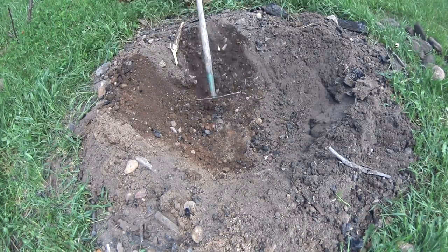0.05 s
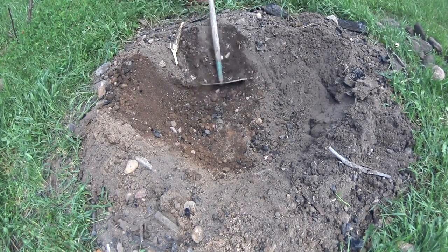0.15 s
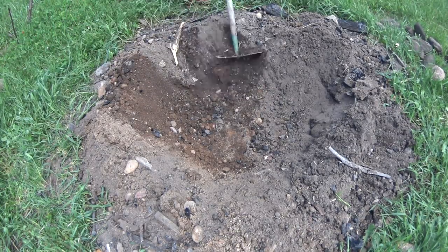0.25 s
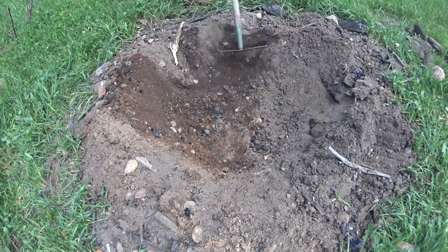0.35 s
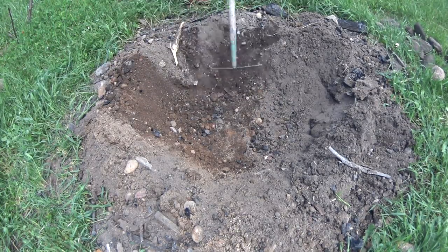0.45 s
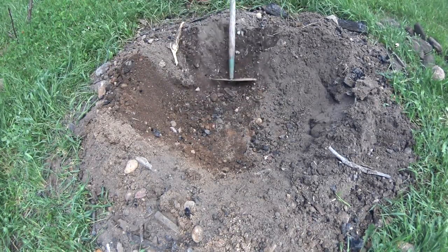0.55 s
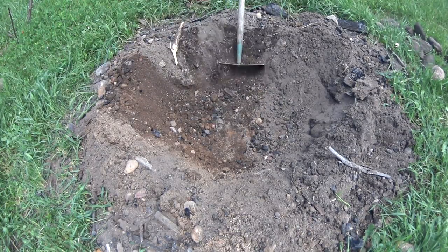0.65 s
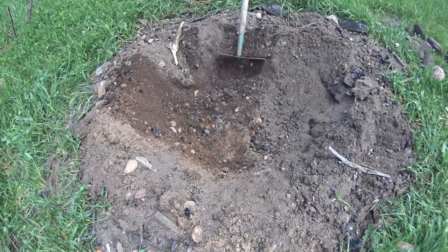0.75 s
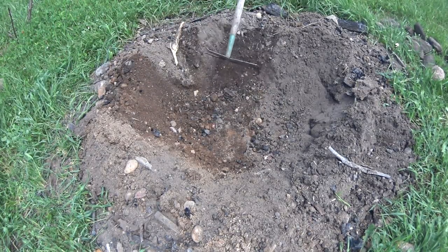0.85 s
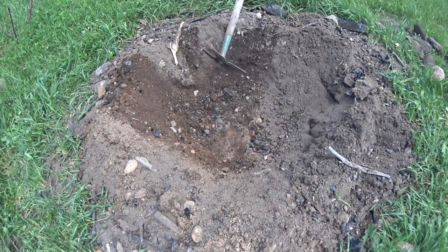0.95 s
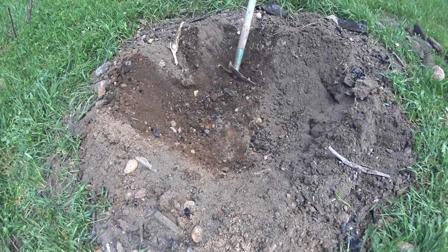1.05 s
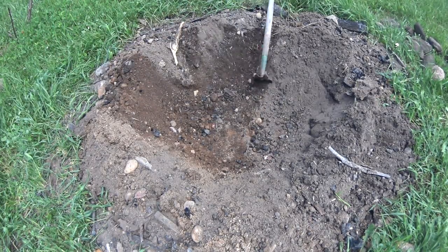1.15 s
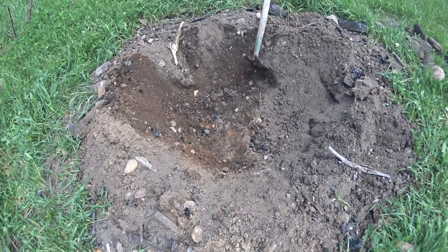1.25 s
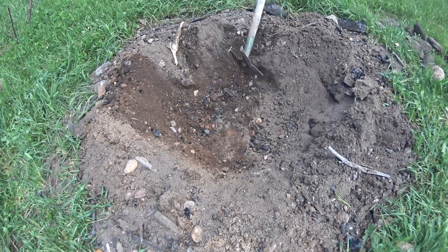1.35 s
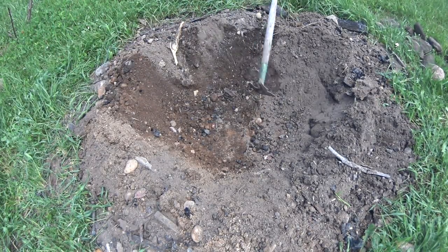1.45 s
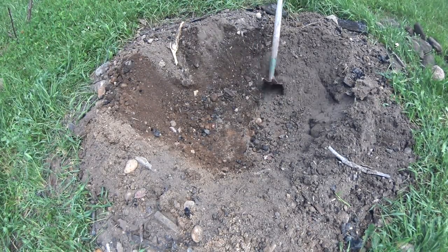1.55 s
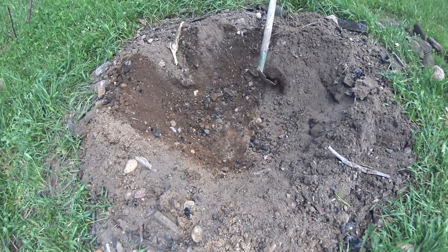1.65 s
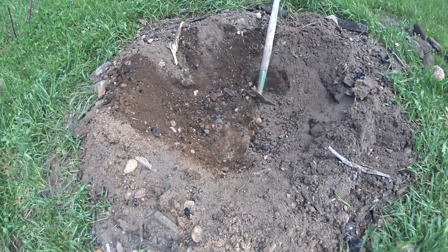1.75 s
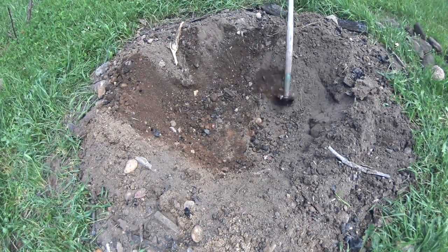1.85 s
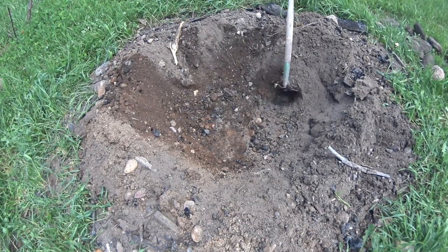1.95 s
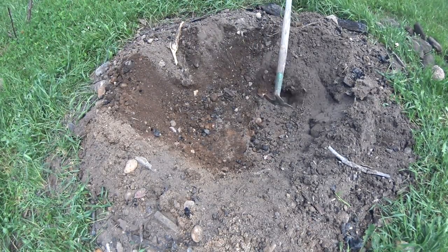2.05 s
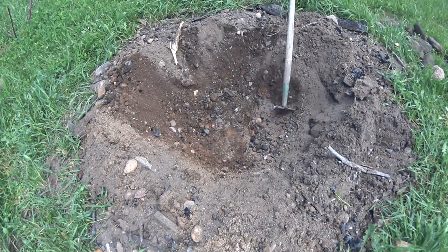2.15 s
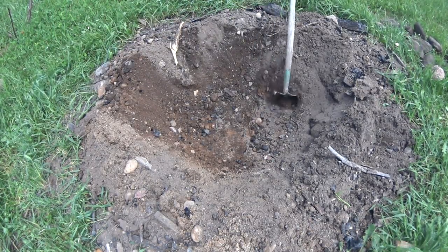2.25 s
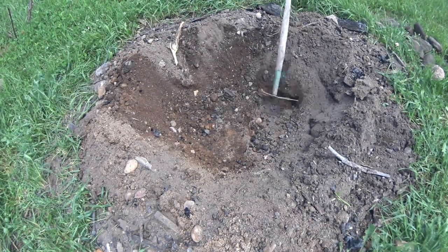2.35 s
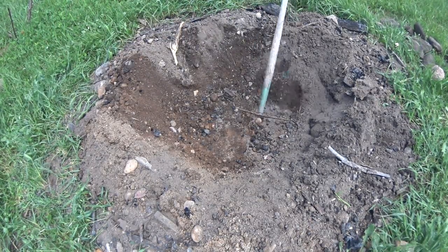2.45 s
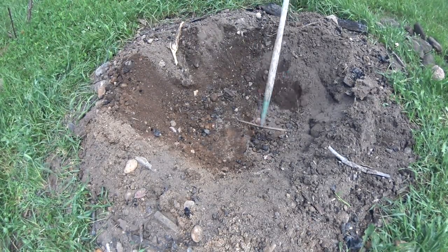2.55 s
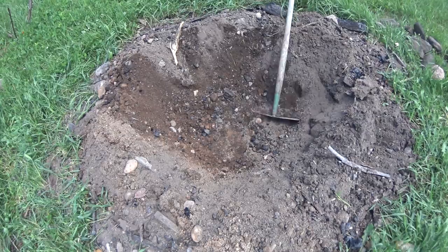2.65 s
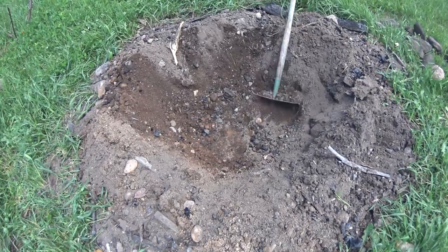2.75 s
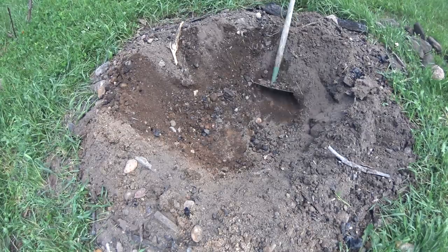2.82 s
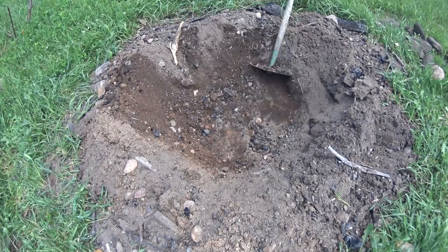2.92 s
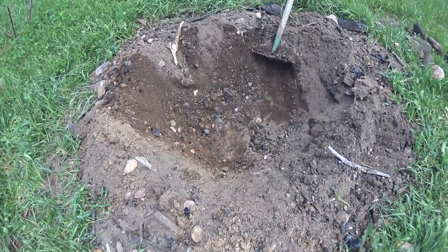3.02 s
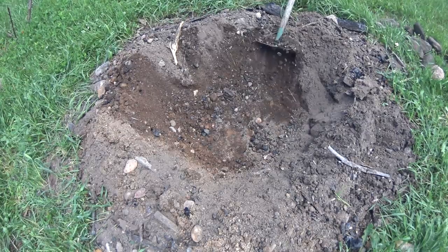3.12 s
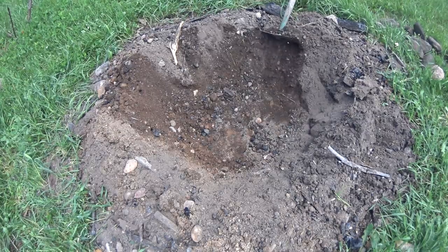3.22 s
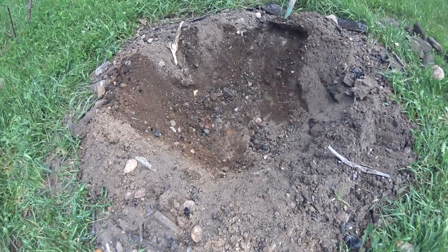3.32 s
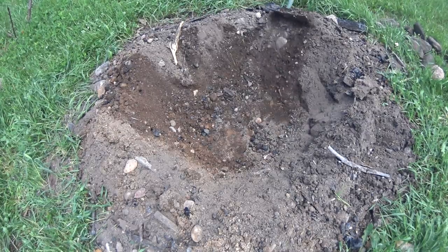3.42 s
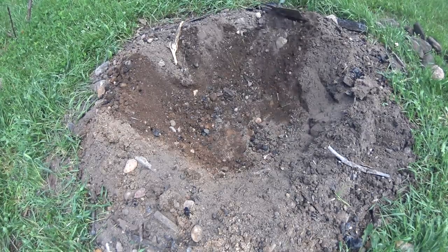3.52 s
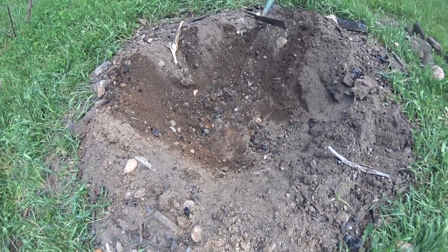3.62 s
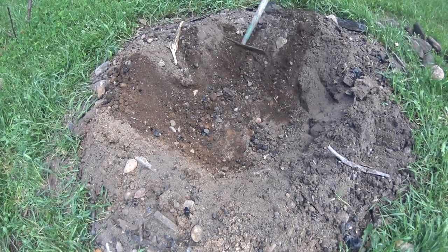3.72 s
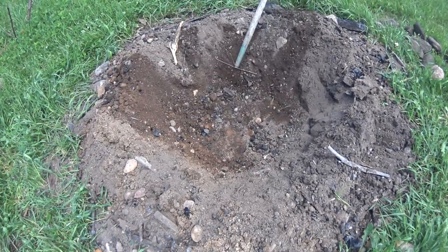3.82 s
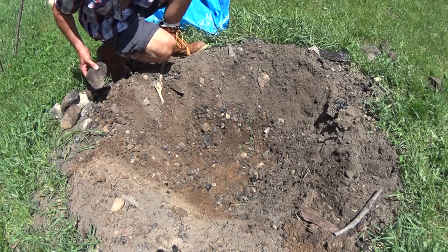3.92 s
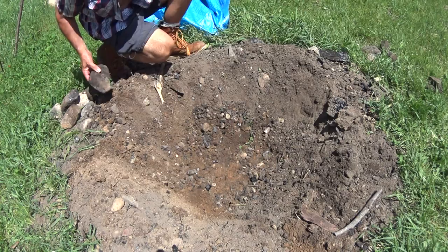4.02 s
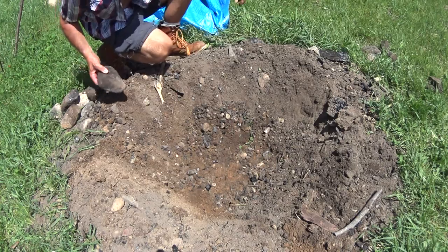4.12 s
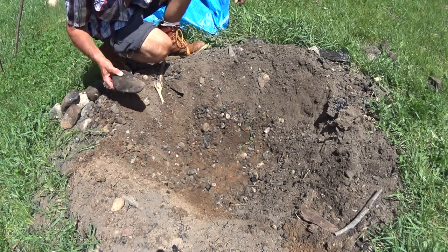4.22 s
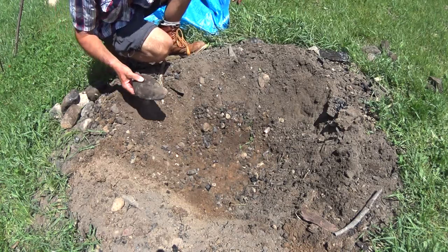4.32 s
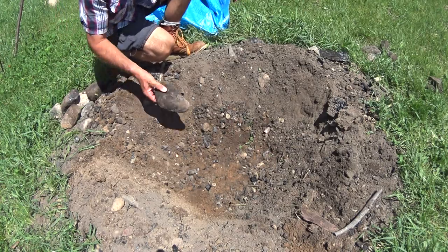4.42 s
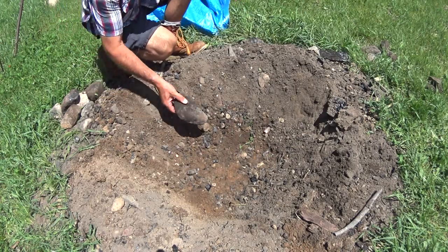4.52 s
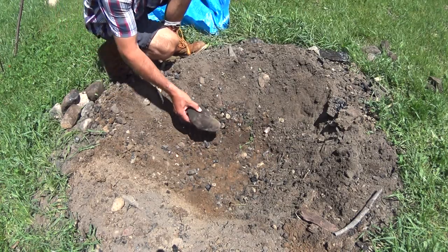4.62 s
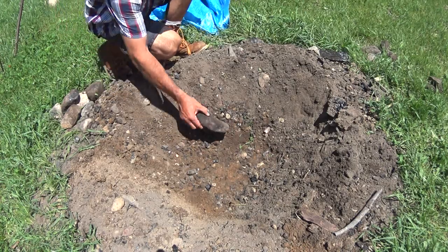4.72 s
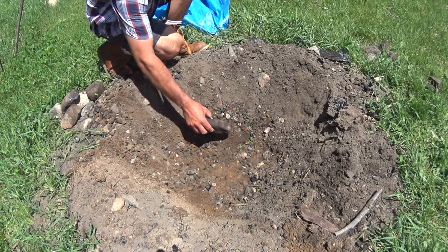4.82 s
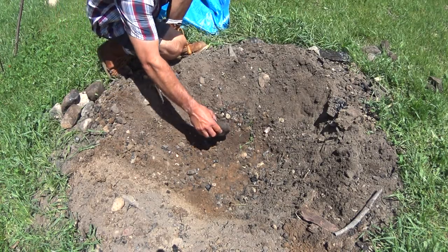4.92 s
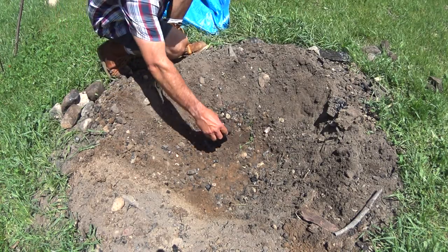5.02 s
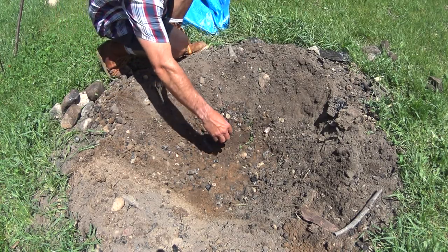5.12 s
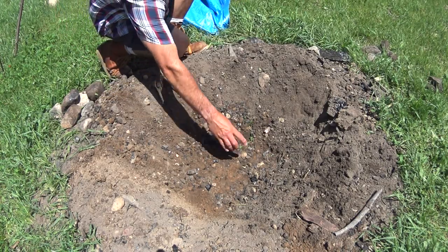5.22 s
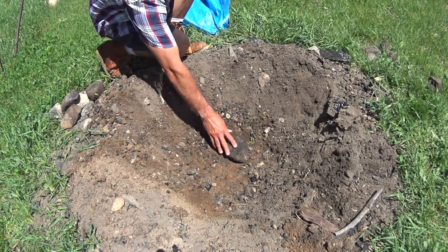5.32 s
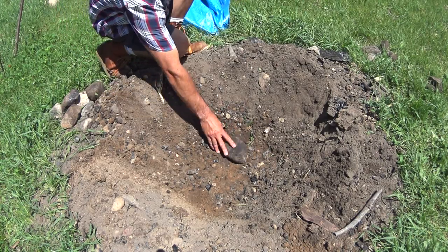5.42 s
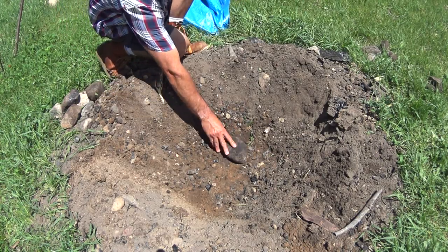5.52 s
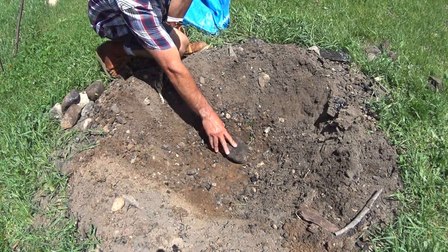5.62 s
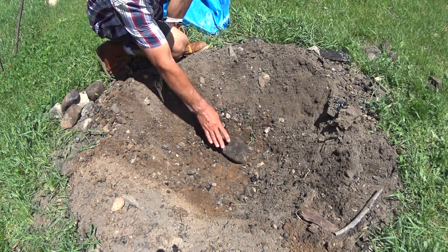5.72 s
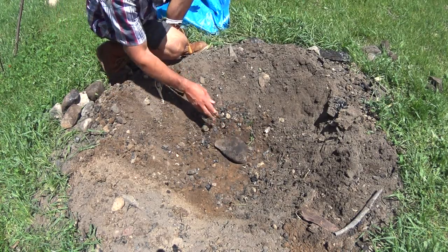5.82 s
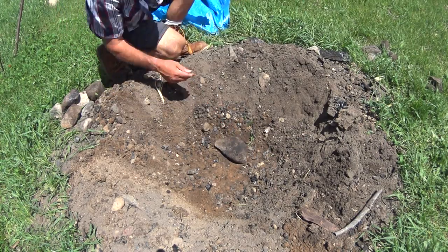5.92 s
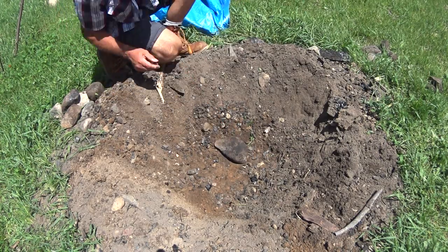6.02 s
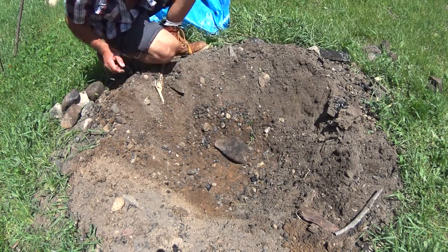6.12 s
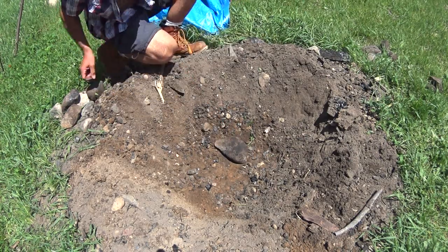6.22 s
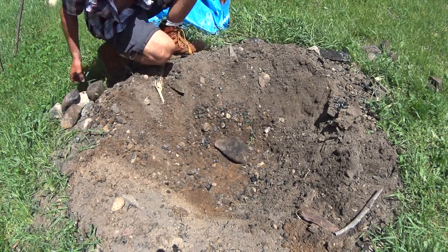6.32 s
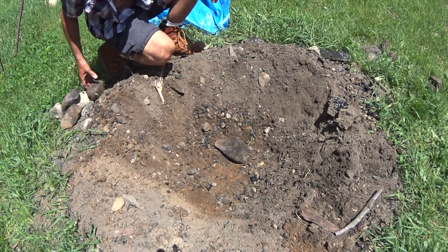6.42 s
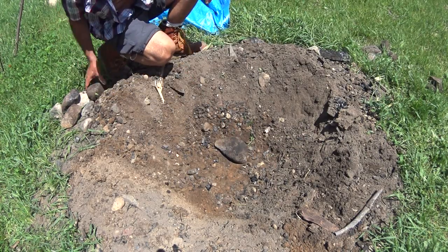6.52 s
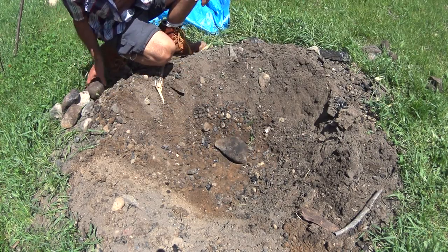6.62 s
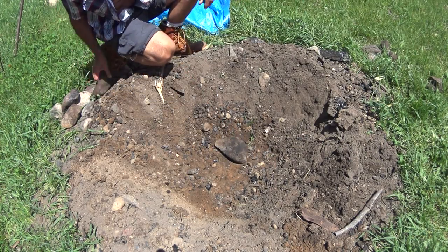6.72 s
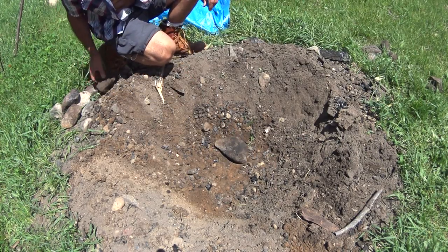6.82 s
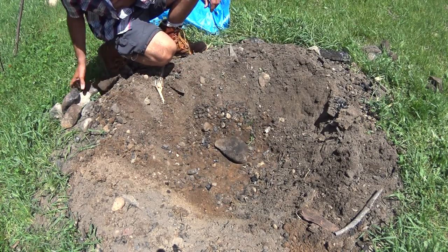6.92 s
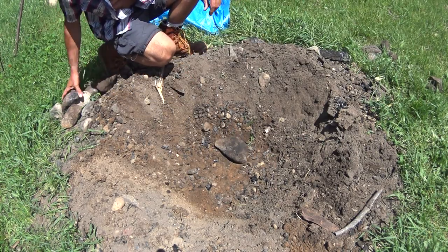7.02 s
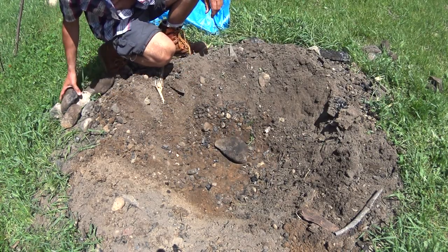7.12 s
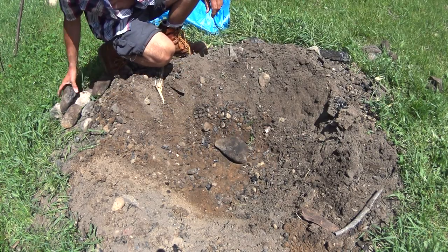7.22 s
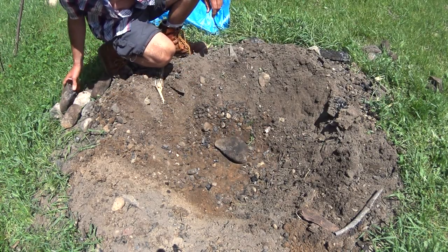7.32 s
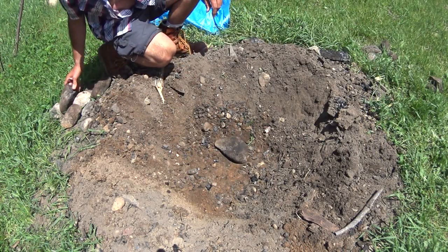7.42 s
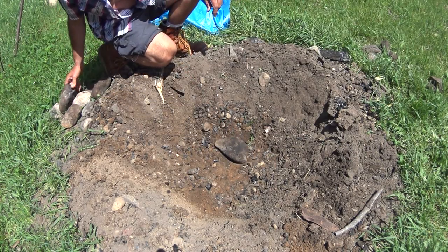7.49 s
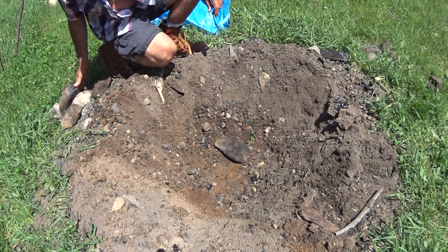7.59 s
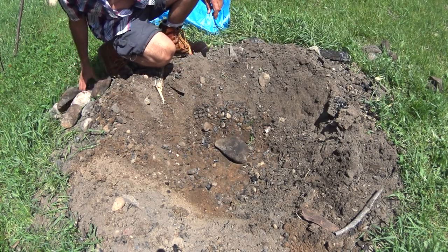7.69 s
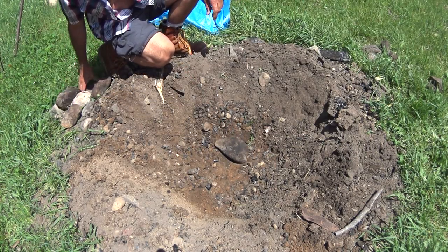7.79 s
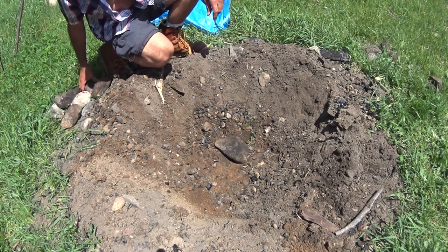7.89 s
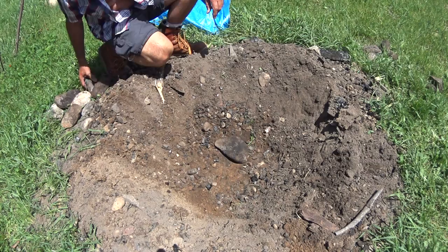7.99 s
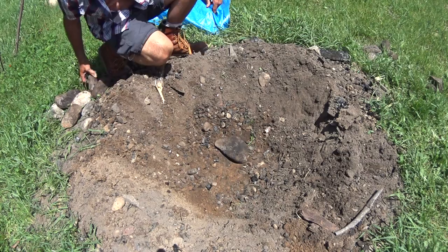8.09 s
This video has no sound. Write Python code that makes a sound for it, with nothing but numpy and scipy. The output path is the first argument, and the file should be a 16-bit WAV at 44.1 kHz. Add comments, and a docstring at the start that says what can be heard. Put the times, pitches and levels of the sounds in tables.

```python
"""A steel rake chops into stony soil in a meadow; the blows crunch, ring the head and thump up through the camera stand,
which creaks. After a cut, with a click, to a quieter moment a hand lays a stone down and picks among others; birds call.
Random grit drives steel modes or filtered ticks; the stand is decaying sines, rumble and joint ticks;
birds are gliding sines and rough trills with echoes; falling grains and banded noise lie under all."""
import sys
import numpy as np
from scipy import signal
from scipy.io import wavfile

SR = 44100
rng = np.random.default_rng(int(sys.argv[2]) if len(sys.argv) > 2 else 0)


def output_pcm(signal):
    """Save a mono or channel-first signal as 16-bit PCM at the path in sys.argv[1].

    Samples are clipped to [-1, 1] before scaling.
    """
    pcm = np.clip(np.atleast_2d(signal).T, -1, 1) * 32767
    wavfile.write(sys.argv[1], SR, np.round(pcm).astype(np.int16))


N = 359415
CUT_S = 3.93   # the quieter moment starts
OPPOSITE = np.array([[1], [-1]])   # left and right in opposite phase


def from_db(db):
    """Gain of a level."""
    return 10 ** (np.asarray(db) / 20)


def rms_one(x):
    """Scaled to rms 1."""
    return x / np.sqrt(np.mean(x ** 2) + 1e-20)


def peak_one(x):
    """Scaled to peak 1."""
    return x / np.abs(x).max()


def at_hz(points, hz):
    """A spectrum read on a log frequency axis."""
    points = np.array(points)
    return np.interp(np.log(hz), np.log(points[:, 0]), points[:, 1])


def band(x, low_hz, high_hz):
    """Butterworth band-pass."""
    edges_hz = [low_hz, min(high_hz, .45 * SR)]
    return signal.sosfilt(signal.butter(2, edges_hz, "band", fs=SR, output="sos"), x)


def resonance(x, hz, width_hz):
    """Two-pole resonance, gain 1 on top."""
    r = np.exp(-np.pi * width_hz / SR)
    zeros = np.array([1, 0, -1]) * (1 - r * r) / 2
    poles = [1, -2 * r * np.cos(2 * np.pi * hz / SR), r * r]
    return signal.lfilter(zeros, poles, x)


def ring(modes, t, spread_db):
    """Decaying sines, each struck with a random strength."""
    total = 0
    for hz, db, t60_s in modes:
        level_db = db - 60 * t / t60_s + spread_db * rng.standard_normal()
        total = total + from_db(level_db) * np.sin(2 * np.pi * hz * t)
    return total


def grit(count, per_s, spread_db):
    """Random contacts of either sign; a spread above 0 dB makes their sizes uneven."""
    sizes = from_db(spread_db * np.minimum(rng.exponential(1, count), 5)) * rng.choice([-1, 1], count)
    return sizes * (rng.random(count) < per_s / SR)


def drift(count, rate_hz):
    """Low-passed noise of rms 1."""
    low_pass = signal.butter(2, rate_hz, fs=SR, output="sos")
    return rms_one(signal.sosfilt(low_pass, rng.standard_normal(count)))


def add(out, s, sound, pan_db):
    """Mixes a sound in at s seconds; pan_db is left over right."""
    i = round(s * SR)
    sound = sound[..., :N - i]
    out[:, i:i + sound.shape[-1]] += sound * from_db([[pan_db / 2], [-pan_db / 2]])


def rake_and_click():
    """Dense grit drives a broad crack and the damped head modes, scattered stones widen it; the cut's click likewise."""
    # rake on gravel, but the last row is the click at the cut: t/s, peak/dB, brightest f/Hz, crunch length/s
    blows_and_click = [(0.1506, -24.5, 2980, 0.025), (0.1609, -6, 4630, 0.013), (0.179, -22, 5800, 0.024),
                       (0.2126, -21, 3450, 0.02), (0.233, -20.5, 5060, 0.014), (0.295, -28, 3800, 0.011),
                       (0.358, -23, 3320, 0.012), (.601, -20.5, 3600, 0.009), (0.612, -15.5, 3180, 0.013),
                       (.627, -23, 3170, 0.011), (0.672, -33.5, 3700, 0.025), (1.082, -29, 2570, 0.025),
                       (1.111, -26.5, 4130, 0.0065), (1.1818, -7.5, 3300, 0.0064),
                       (1.5504, -5.5, 2430, 0.0063), (1.8714, -4.5, 6100, 0.011),
                       (2.2054, -7.5, 4700, 0.012), (2.6532, -22.5, 2920, 0.0078),
                       (2.6627, -5, 5000, 0.0078), (2.743, -32, 7600, 0.026), (2.812, -32.5, 4300, 0.015),
                       (2.843, -33, 7000, 0.0066), (2.859, -32.5, 3620, 0.011), (2.904, -42, 5000, .01),
                       (2.951, -40.5, 4500, 0.0069), (3.031, -29.5, 3630, 0.006),
                       (3.041, -30.5, 3180, 0.004), (3.262, -26, 2800, 0.021), (3.301, -39, 6000, 0.013),
                       (3.327, -35.5, 6000, .004), (3.3525, -35.5, 2400, 0.013), (3.922, -33, 4850, 0.0096)]
    # damped head modes: f/Hz, width/Hz, level/dB
    head_modes = [(1900, 120, -7), (2370, 200, -3), (2860, 90, -1), (3450, 80, -5), (3950, 200, -5),
                  (4800, 150, -6), (5180, 90, -3), (5600, 100, -2), (7600, 220, -11), (9040, 250, -11),
                  (10900, 400, -6)]
    # head pulled on through loose gravel: from/s, to/s
    dragged = [(.15, .25), (2.6, 2.7), (3.2, 3.3)]
    rattle_db, drag_rattle_db, rattle_t60_s = -25, -12.5, .28   # gravel settling, re crunch
    thud_db = -37.5   # the soil's dull answer, re blow
    out, t = np.zeros((2, N)), np.arange(SR // 4) / SR
    thin = signal.butter(5, 1650, "high", fs=SR, output="sos")   # blows sound thin: steep low cut
    for s, db, hz, length_s in blows_and_click:
        attack = np.minimum(t / (.2 * length_s), 1)
        crunch = attack * from_db(-9 * t / length_s - 60 * np.maximum(t - length_s, 0) / .042)
        is_dragged = any(start < s < end for start, end in dragged)
        rattle = from_db((drag_rattle_db if is_dragged else rattle_db) - 60 * t / rattle_t60_s)
        contacts, scatter = (grit(len(t), per_s=9000, spread_db=3.5) for k in range(2))
        settling = rms_one(grit(len(t), per_s=1500, spread_db=3.5))   # separate grains
        crack = from_db(-6.5) * band(crunch * contacts, 2000, 12000)
        crack += band(crunch * contacts, hz / 1.3, hz * 1.3)
        drive = crunch * contacts + rattle * band(settling, 1500, 8000)
        head = 0
        for mode_hz, width_hz, mode_db in head_modes:
            # modes near the brightest pitch win
            near_db = -5 * abs(np.log2(mode_hz / hz)) + 5 * rng.standard_normal()
            head = head + from_db(mode_db + near_db) * resonance(drive, mode_hz, width_hz)
        impact = peak_one(signal.sosfilt(thin, crack + from_db(11) * head))
        wide = peak_one(band((crunch + .3 * rattle) * scatter, 1500, 12000))
        thud = peak_one(band(crunch * scatter, 220, 1370))
        add(out, s, from_db(db) * impact, pan_db=-.8)
        add(out, s, from_db(db - 10) * wide * OPPOSITE, pan_db=0)
        add(out, s, from_db(db + thud_db) * thud, pan_db=9)
    return out


def tines():
    """Blows that leave the tines free let their modes ring."""
    # rings: t/s, level/dB
    rings = [(.36, -42.5), (1.58, -52)]
    # free modes: f/Hz, level/dB, t60/s
    tine_modes = [(2110, 0, .6), (2207, -3, .55), (3451, -3, .25), (3870, 6, .11)]
    out, t = np.zeros((2, N)), np.arange(SR // 2) / SR
    for s, db in rings:
        add(out, s, from_db(db) * ring(tine_modes, t, spread_db=1) * (1 - np.exp(-t / .002)), pan_db=-1)
    return out


def scrapes():
    """Quick slips keep one or two resonances buzzing: two of a tine, one of stone on stone."""
    # t/s, length/s, level/dB, resonances (f/Hz, width/Hz, level/dB)
    slides = [(1.204, 0.073, -50.5, [(1880, 170, 0)]), (1.902, 0.076, -51.5, [(1850, 120, 0)]),
              (7.844, .11, -56.5, [(4200, 250, 6), (9600, 900, -7)])]
    out = np.zeros((2, N))
    for s, length_s, db, resonances in slides:
        t = np.arange(int(length_s * SR)) / SR
        slips = grit(len(t), per_s=5000, spread_db=3) * np.sin(np.pi * t / length_s) ** .5
        buzz = sum(from_db(r_db) * rms_one(resonance(slips, hz, width_hz)) for hz, width_hz, r_db in resonances)
        add(out, s, from_db(db) * rms_one(buzz), pan_db=-1)
    return out


def stones():
    """Stone on stone or soil: a tick with a gritty tail; short tails click, long ones crunch."""
    # t/s, peak/dB, brightest f/Hz, tail t60/s
    touches = [(4.742, -38.5, 3210, .015), (5.315, -41, 3000, .015), (5.339, -14, 4200, 0.014),
               (5.347, -27, 2330, 0.038), (5.358, -37, 2310, 0.066), (5.398, -35.5, 4840, 0.021),
               (6.619, -30, 8700, 0.012), (6.635, -42, 5040, .035), (6.723, -31, 3240, 0.014),
               (6.751, -37, 3800, .012), (6.759, -37.5, 4200, .06), (7.102, -38.5, 8350, 0.031),
               (7.321, -44, 2480, .03), (7.3974, -31.5, 3750, 0.021), (7.627, -26, 5300, 0.024),
               (7.689, -38, 4260, 0.047), (7.7576, -41, 1930, 0.027), (7.79, -37, 2210, 0.019),
               (7.891, -39, 9500, 0.037), (7.912, -30, 4420, 0.065), (7.919, -29.5, 3400, 0.03),
               (7.9315, -32, 4400, .012), (7.955, -30.5, 3700, 0.024)]
    out, t = np.zeros((2, N)), np.arange(SR // 8) / SR
    for s, db, hz, t60_s in touches:
        contacts = from_db(-60 * t / t60_s) * grit(len(t), per_s=12000, spread_db=3)
        contacts[0] = .13 / t60_s   # first touch
        tick = from_db(-8.5) * band(contacts, 1700, 3 * hz) + band(contacts, hz / 1.206, hz * 1.28)
        tick = band(band(tick, 1300, 20000), 1300, 20000)
        add(out, s, from_db(db) * peak_one(tick), pan_db=2.0)
    return out


def stand():
    """Ground-borne blows knock the legs and sway the head; joints snap, louder on the right, and jolt the legs."""
    # blows through the ground: t/s, knock peak/dB, sway level/dB
    thumps = [(0.619, -45, -54), (1.195, -32.5, -46), (1.556, -32, -49), (1.888, -30.5, -46),
              (2.221, -36.5, -48.5), (2.674, -36.5, -53.5), (5.353, -38, -64.5), (7.646, -64, -63),
              (7.9, -66, -67.5)]
    # loudest joint ticks: t/s, peak/dB
    creaks = [(1.985, -41), (1.996, -38), (2.03, -45), (2.115, -43), (2.2, -28), (2.242, -19),
              (2.268, -21.5), (2.292, -29.5), (2.459, -36.5), (2.477, -42.5), (2.788, -43)]
    # knock modes of the legs: f/Hz, level/dB, t60/s
    leg_modes = [(177, -1, 0.092), (357, -8.5, 0.046), (452, -11.5, 0.051)]
    # slow modes of the head on its legs: f/Hz, level/dB re sway, t60/s
    sway_modes = [(53.3, 0, 1.3), (98.8, 10, 0.29)]
    out, t = np.zeros((2, N)), np.arange(SR) / SR
    for s, db, sway_db in thumps:
        knock = peak_one(ring(leg_modes, t, spread_db=3.5) * (1 - np.exp(-t / .004)) ** 2)
        sway = ring(sway_modes, t, spread_db=1) * (1 - np.exp(-t / .012))
        add(out, s, from_db(db) * knock + from_db(sway_db) * sway, pan_db=0.5)
    t = t[:SR // 20]
    for s, db in creaks:
        snap = from_db(-60 * t / .009) * rng.standard_normal(len(t))
        top_hz = 4900 + 80 * max(db, -35)   # weak ticks are duller
        tick = band(band(snap, 1100, top_hz), 1100, top_hz) + .07 * band(snap, 3300, 14000)
        jolt = peak_one(ring(leg_modes[1:], t, spread_db=5))
        add(out, s, from_db(db) * peak_one(tick), pan_db=-11)
        add(out, s, from_db(-37 + 0.21 * db) * jolt, pan_db=2)
    return out


def shake_db():
    """Level of the stand's shaking: bouts swell and sink over a tremor that dies away until the cut."""
    # start/s, length/s, rumble level/dB
    bouts = [(1.964, .18, -48), (2.182, 0.12, -40.5), (2.288, 0.093, -47.5), (2.373, 0.066, -47),
             (2.417, 0.075, -44.5), (2.757, 0.066, -46.5), (2.911, 0.051, -57.5), (3.37, 0.18, -63)]
    tremor_s, tremor_db, tremor_db_per_s = 1.95, -57, -10
    t = np.arange(N) / SR
    power = from_db(2 * (tremor_db + tremor_db_per_s * (t - tremor_s))) * (t > tremor_s) * (t < CUT_S)
    for s, length_s, db in bouts:
        power += from_db(2 * db) * np.sin(np.pi * np.clip((t - s) / length_s, 0, 1)) ** 0.89
    return 10 * np.log10(power + 1e-12)


def shaking_stand():
    """Shaking rumbles in lumps; the small joint ticks grow faster than the shaking."""
    shake_ref_db, ticks_db, ticks_db_per_db = -40, -36.5, 3.66   # ticks_db holds at shake_ref_db
    deep_db = -68.5   # constant while the tremor lasts
    out, level_db = np.zeros((2, N)), shake_db()
    ticks = rms_one(band(band(grit(N, per_s=870, spread_db=3.0), 970, 2900), 970, 2900))
    add(out, 0, from_db(ticks_db + ticks_db_per_db * (level_db - shake_ref_db)) * ticks, pan_db=-13.0)
    shaking = from_db(level_db + 2.5 * drift(N, rate_hz=30))
    common = rms_one(band(band(grit(N, per_s=450, spread_db=2.5), 150, 450), 110, 500))
    apart = rms_one(band(band(grit(N, per_s=500, spread_db=2.5), 350, 680), 350, 680))
    deep = from_db(deep_db) * rms_one(band(rng.standard_normal(N), 18, 150)) * (level_db > -100)
    return out + deep + shaking * (common + from_db(-7.0) * apart * OPPOSITE)


def birds():
    """Near sines glide in pitch, trills are pulsed wavering tones; a decaying noise tail echoes from the tree line."""
    # bird notes, but the 0.16 s row is a faint echo lingering after the 3.36 kHz note:
    # length/s, first f/Hz, last f/Hz, glide constant/s, left over right/dB; then starts (t/s, level/dB)
    notes_and_echo = [((.055, 3600, 6030, .005, 0), [(4.293, -63), (4.541, -61), (4.764, -61)]),
                      ((0.07, 7150, 7080, -0.5, -7), [(4.974, -59), (5.345, -55)]),
                      ((.088, 4090, 4055, 0.035, 4.5), [(5.07, -41), (5.455, -38.5)]),
                      ((0.03, 5480, 4730, 0.1, 0), [(5.167, -47.5), (5.552, -49.5)]),
                      ((0.036, 2330, 2360, .026, 5), [(5.634, -54)]), ((0.0266, 3363, 3310, .03, -8),
                      [(5.975, -43), (6.4, -49)]), ((.16, 3350, 3320, .1, 0), [(5.985, -63), (6.41, -64)]),
                      ((0.02, 7400, 7900, .03, -8), [(6.057, -57)]), ((.049, 6100, 4400, .045, 2),
                      [(6.096, -49)]), ((0.15, 7702, 6602, .026, -12), [(6.472, -58)])]
    # trills: t/s, length/s, level/dB, tones (f/Hz, level/dB)
    trills = [(5.7, 0.24, -55.5, [(3340, -5), (4120, -2), (4850, 0)]), (5.774, 0.26, -57.5, [(2210, 0)]),
              (5.78, 0.17, -59.5, [(2780, 0)]), (6.165, 0.18, -60.5, [(2190, -3), (2700, -10)])]
    pulses_per_s, meadow_t60_s, meadow_db = 64, .8, -13
    out = np.zeros((2, N))
    for (length_s, first_hz, last_hz, glide_s, pan_db), starts in notes_and_echo:
        t = np.arange(int(length_s * SR)) / SR
        for s, db in starts:
            hz = last_hz + (first_hz - last_hz) * np.exp(-t / glide_s)
            hz += .13 * (hz - last_hz) * drift(len(t), rate_hz=400)   # fast glides break up
            roughness_db = np.clip(last_hz / 400 - 10.5, 0, 5)   # high notes are rougher
            flutter = from_db(roughness_db * drift(len(t), rate_hz=200))
            skew = .45 if abs(first_hz - last_hz) > 700 else 1.5   # wide glides peak early
            swell = np.sin(np.pi * (t / length_s) ** skew) ** 0.42
            tone = flutter * swell * np.sin(2 * np.pi * np.cumsum(hz) / SR)
            add(out, s, from_db(db) * tone, pan_db)
    for s, length_s, db, tones in trills:
        t = np.arange(int(length_s * SR)) / SR
        buzz = 0
        for hz, tone_db in tones:
            wavering_hz = hz + 120 * drift(len(t), rate_hz=420)
            buzz = buzz + from_db(tone_db) * np.sin(2 * np.pi * np.cumsum(wavering_hz) / SR)
        buzz = buzz * (1 + 0.25 * np.sin(2 * np.pi * pulses_per_s * t))
        swell = np.sin(np.pi * (t / length_s) ** .55) ** .5
        add(out, s, from_db(db) * swell * rms_one(buzz), pan_db=0)
    t = np.arange(SR // 2) / SR
    echoes = rng.standard_normal((2, len(t))) * from_db(-60 * t / meadow_t60_s) * (t > .015)
    echoes /= np.sqrt(np.sum(echoes ** 2, axis=1, keepdims=True))
    return out + from_db(meadow_db) * signal.fftconvolve(out, echoes, axes=1)[:, :N]


def soil():
    """Fine grains trickle, thinning while the rake works, with brighter spurts; larger grains tick in the treble."""
    # spurts: middle/s, width/s, treble level/dB
    spurt_list = [(.05, 0.25, -66.5), (1.07, 0.14, -56.5), (6.7, 0.084, -67), (7.25, 0.13, -70),
                  (7.9, 0.12, -57)]
    soil_db, soil_treble_db, fade_db_per_s2 = -54.5, -61, -0.15   # while raking
    still_db, still_treble_db = -64, -71.5   # after the cut
    spurt_body_db = -9   # re spurt treble
    t = np.arange(N) / SR
    raking, fade_db = t < CUT_S, fade_db_per_s2 * t ** 2
    spurts = sum(from_db(db) * np.exp(-((t - s) / width_s) ** 2) for s, width_s, db in spurt_list)
    body_gain = from_db(np.where(raking, soil_db + fade_db, still_db)) + from_db(spurt_body_db) * spurts
    treble_gain = from_db(np.where(raking, soil_treble_db + fade_db, still_treble_db)) + spurts
    grains = np.array([grit(N, per_s=9000, spread_db=0.0) for k in range(2)])
    grains *= from_db(np.where(raking, 1.4, .8) * drift(N, rate_hz=11.4))
    body = rms_one(band(grains, 1925, 4520))
    treble = rms_one(band(grains + grit(N, per_s=200, spread_db=3.7), 5500, 13000))
    mid, side = body_gain * body + treble_gain * treble
    return mid + from_db(-3.0) * side * OPPOSITE


def air():
    """Far field and microphone hiss: half-octave noise bands of set level and likeness, louder before the cut."""
    # f/Hz, relative density/dB per Hz
    spectrum = [(15, -13), (25, -9.5), (109, 0), (352, 0), (1220, -0.5), (2980, -14.5), (5630, -7),
                (8000, -15), (10900, -17)]
    # f/Hz, left-right likeness (1 same, -1 opposite)
    likeness = [(60, 1), (220, 0.14), (820, -0.66), (3060, -0.56), (11300, 0.028)]
    air_db, before_cut_db = -59, 2.5   # before_cut_db is added to air_db
    out, edges_hz = 0, 18 * 2 ** np.arange(0, 10, .5)
    white = rng.standard_normal((2, 2, N))
    for k, (low_hz, high_hz) in enumerate(zip(edges_hz, edges_hz[1:])):
        mid, side = band(white[k % 2], low_hz, high_hz)   # neighbouring bands are independent
        hz = np.sqrt(low_hz * high_hz)
        alike = np.clip(at_hz(likeness, hz), -1, 1)
        stereo = np.sqrt(1 + alike) * mid + np.sqrt(1 - alike) * side * OPPOSITE
        out = out + from_db(at_hz(spectrum, hz)) * stereo
    return from_db(air_db + before_cut_db * (np.arange(N) < CUT_S * SR)) * rms_one(out)


def scene():
    """All sources at the two microphone ports."""
    foreground = rake_and_click() + tines() + scrapes() + stones() + stand() + shaking_stand()
    return foreground + birds() + soil() + air()


def record(dry):
    """The top is cut: a steep edge, then a slower slope."""
    edge = signal.sosfilt(signal.cheby2(16, 40, 11450, fs=SR, output="sos"), dry)
    return signal.sosfilt(signal.butter(10, 12500, fs=SR, output="sos"), edge)


dry = scene()
out = record(dry)
output_pcm(out)
```